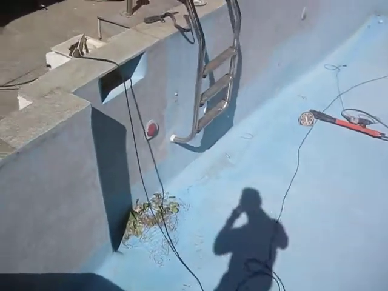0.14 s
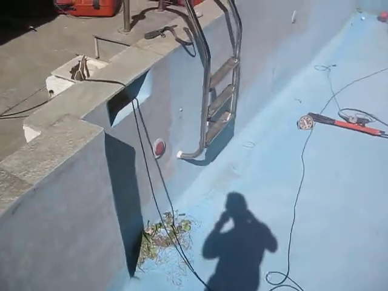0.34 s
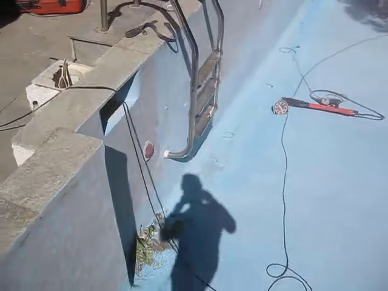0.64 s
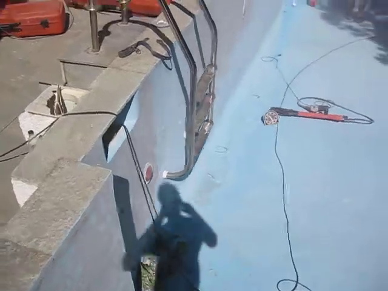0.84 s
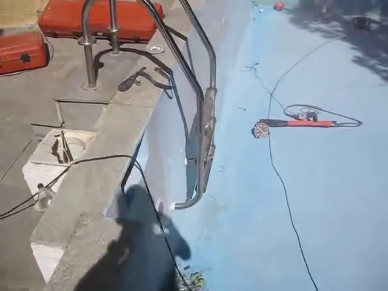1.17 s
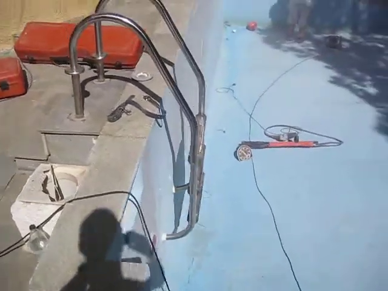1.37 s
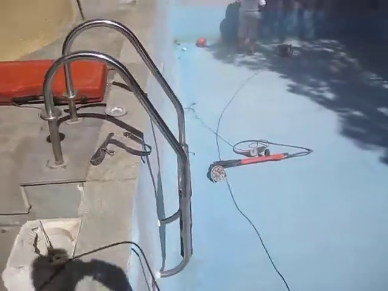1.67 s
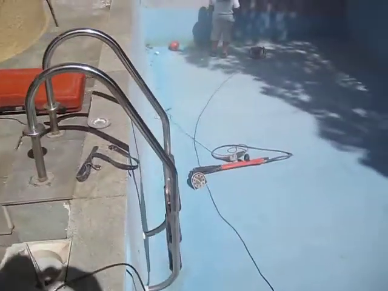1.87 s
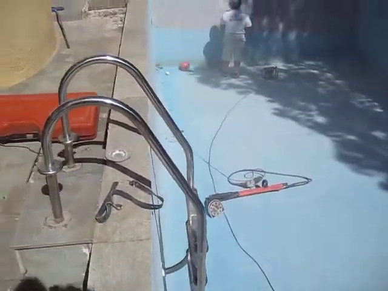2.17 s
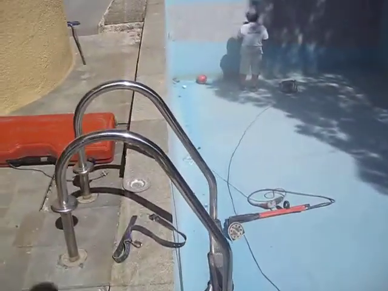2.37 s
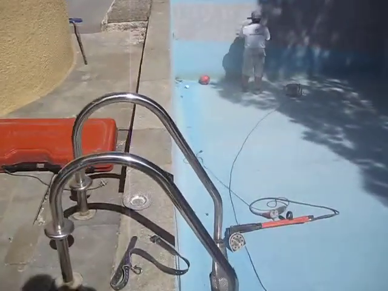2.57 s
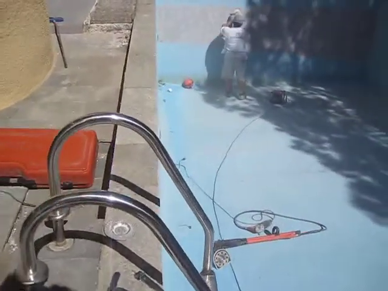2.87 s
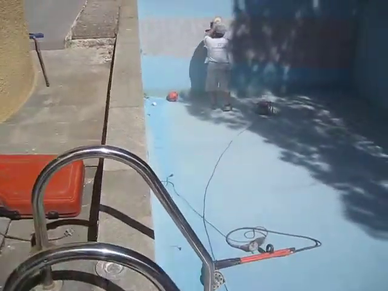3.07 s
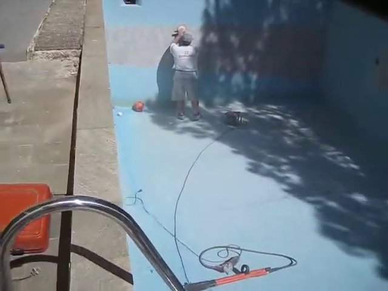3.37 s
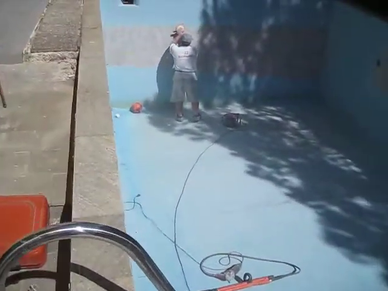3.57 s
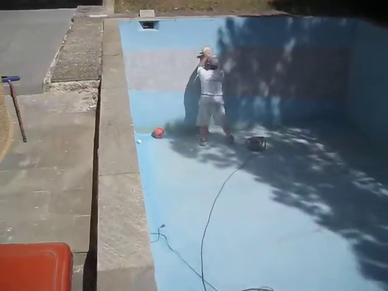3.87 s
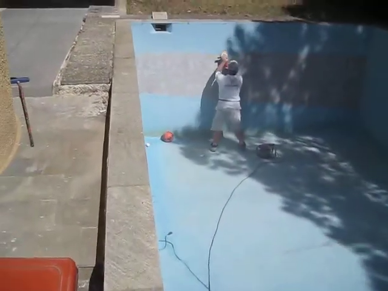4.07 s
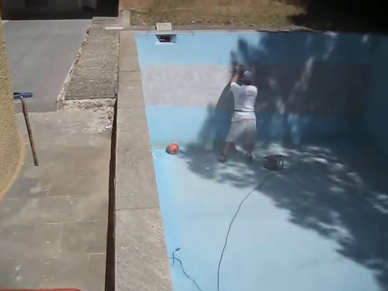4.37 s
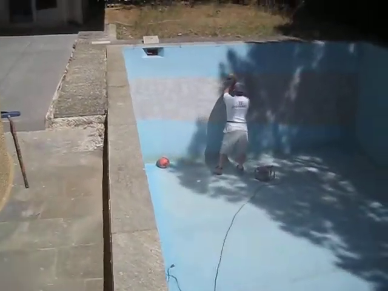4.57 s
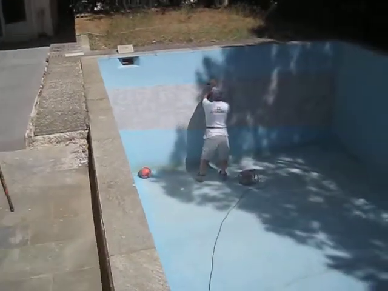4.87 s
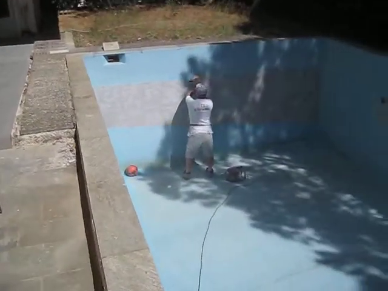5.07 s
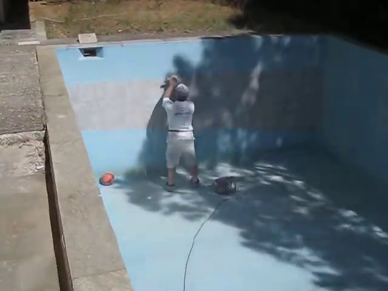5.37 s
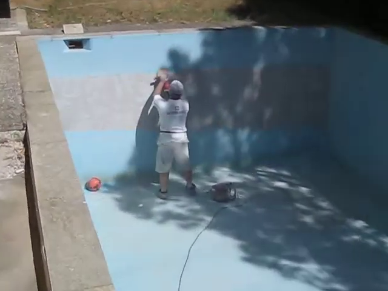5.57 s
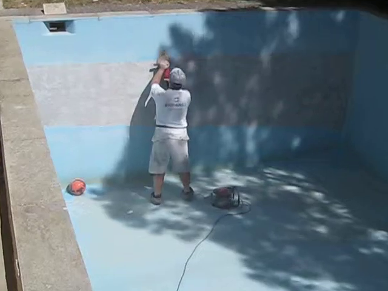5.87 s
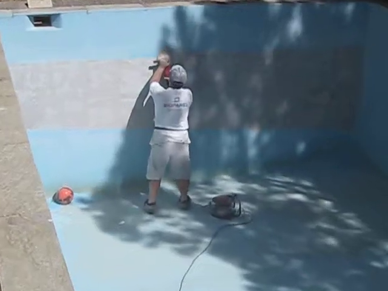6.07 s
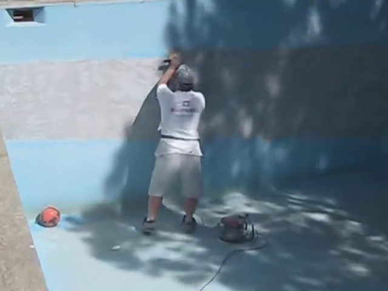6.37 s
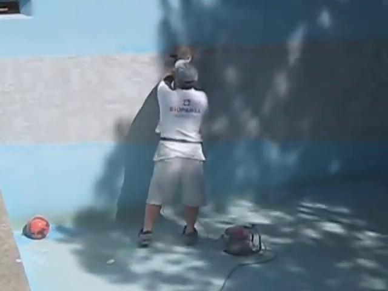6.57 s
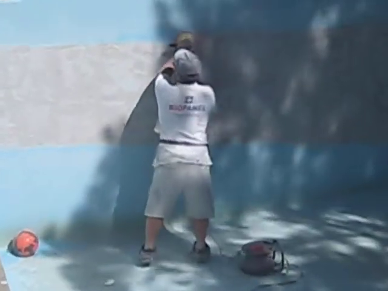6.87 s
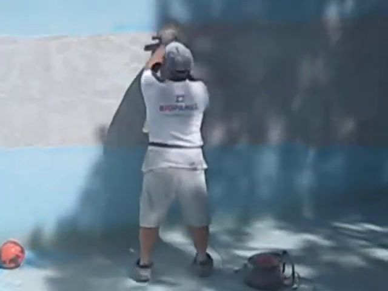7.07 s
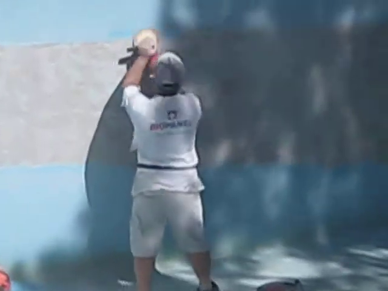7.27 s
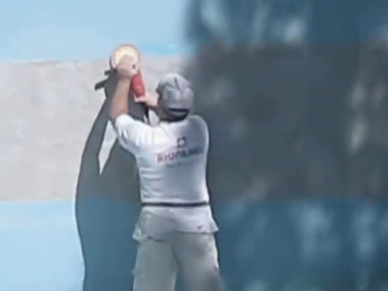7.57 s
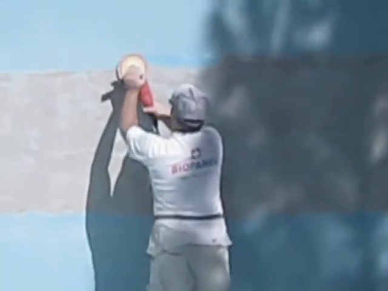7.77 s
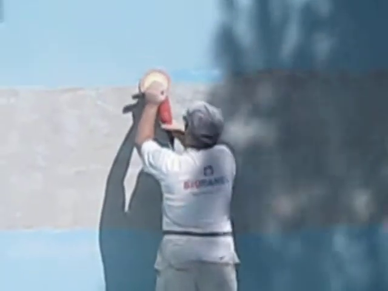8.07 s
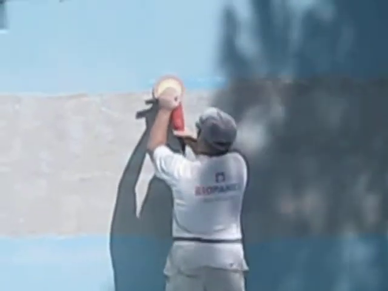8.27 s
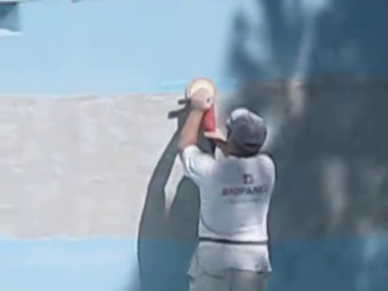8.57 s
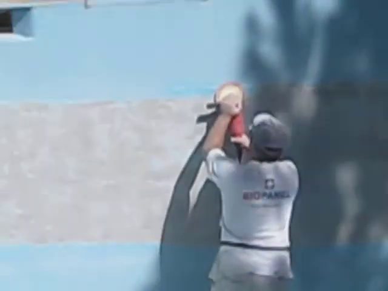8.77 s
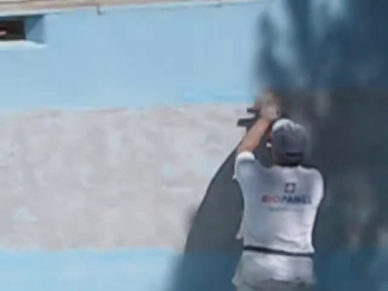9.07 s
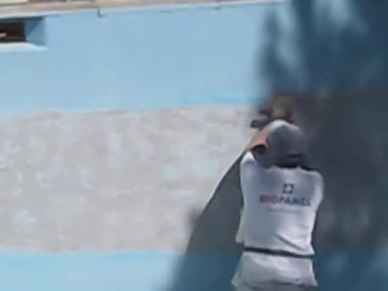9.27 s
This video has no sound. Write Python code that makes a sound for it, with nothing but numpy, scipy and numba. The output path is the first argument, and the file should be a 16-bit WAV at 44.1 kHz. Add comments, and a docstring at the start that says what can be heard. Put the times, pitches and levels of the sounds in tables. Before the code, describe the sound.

An angle grinder works on the wall of an empty concrete pool, heard from the rim with short, hard echoes. For the first three seconds it coasts unpowered: the disc rubs and bounces on the wall in quick runs of slaps, with light metallic pings, while its whine sinks and fades. At about 3.3 seconds the motor cuts in with a sharp clank and whines up to speed within a second. From then on the disc strips paint with a bright, fluttering rasp, a fine hiss and a rough growl, ringing out in brief swells. The whine sags under pressure around 6.3 seconds, recovers, sags again from 8 to 9 seconds and rises as the grinding continues to the end, near 9.5 seconds. Gusts of wind rumble and pop on the microphone, strongest around 3 seconds and easing after 7.

```python
"""An angle grinder strips paint from the wall of an empty concrete pool, heard from the rim.
At first the disc coasts down, bouncing on the wall in short runs under a sinking whine.
At 3.3 s the motor cuts in with a jolt and whines up to speed; later it sags under load.
The grit rasps once per turn, growls on the wall and sets the disc ringing.
All the while the pool returns short echoes and gusts pop on the microphone."""
import sys
import numpy as np
from scipy import signal
from scipy.fft import rfft, irfft, next_fast_len
from scipy.io import wavfile
from scipy.ndimage import uniform_filter1d, map_coordinates
from numba import njit

SR = 44100
rng = np.random.default_rng(int(sys.argv[2]) if len(sys.argv) > 2 else 0)


def to_wav(sig):
    """Store sig (one row per channel, or 1-D mono) as 16-bit WAV at the path in sys.argv[1].

    Samples outside -1..1 are clipped; the rate is SR.
    """
    pcm = np.clip(np.atleast_2d(sig), -1, 1) * 32767
    pcm = np.round(pcm).astype(np.int16)
    wavfile.write(sys.argv[1], SR, pcm.T)  # frames by channels


N = 415422
TIME = np.arange(N) / SR
SWITCH_ON_S = 3.293
WHINE_ORDER = 37.66   # motor whine cycles per turn of the disc


def from_db(db):
    return 10 ** (np.asarray(db) / 20)


def rms_one(x):
    return x / np.sqrt(np.mean(x ** 2) + 1e-20)


def noise():
    return rng.standard_normal(N)


def curve(rows):
    """An automation line through (seconds, value) points."""
    return np.interp(TIME, *np.transpose(rows))


def swells(rows, rest_db):
    """Level in dB of rounded swells over a resting level."""
    power = sum(from_db(db) ** 2 / (1 + (2 * (TIME - s) / length) ** 6) for s, length, db in rows)
    return 10 * np.log10(from_db(rest_db) ** 2 + power)


def coloured(x, spectrum):
    """Equalises a sound through (Hz, dB) points; rms 1."""
    hz, db = np.transpose(spectrum)
    size = next_fast_len(N)
    bins = np.maximum(np.arange(size // 2 + 1) * SR / size, 1)
    gain = from_db(np.interp(np.log(bins), np.log(hz), db))
    return rms_one(irfft(rfft(x, size) * gain, size)[:N])


def drift(rate):
    """A random wander through `rate` points a second; rms 1."""
    knots = rng.standard_normal(4000)
    return rms_one(map_coordinates(knots, [TIME * rate], order=1, mode="wrap"))


@njit
def sweep(x, centre, width):
    """A resonance whose centre moves; frequencies in cycles per sample."""
    out, state, decay = np.zeros(len(x)), 0j, np.exp(-np.pi * width)
    for i in range(len(x)):
        state = state * decay * np.exp(2j * np.pi * centre[i]) + x[i]
        out[i] = state.real
    return out


def resonance(x, hz, width_hz):
    """Two moving resonances in a row, for steep flanks; rms 1."""
    centre, width = hz / SR, width_hz / SR
    return rms_one(sweep(sweep(x, centre, width), centre, width))


def grit(spread_db):
    """Dense fractures of unequal size."""
    return rms_one(noise() * from_db(spread_db * drift(1500)))


def each_turn(turns, share):
    """The same bumps come round on every turn; the lower the share, the more fresh noise joins them."""
    count, size = 64, 1024
    bumps = rms_one(irfft(np.r_[0, np.exp(2j * np.pi * rng.random(count))], size))
    repeated = np.interp(turns % 1, np.arange(size) / size, bumps, period=1)
    return np.sqrt(share) * repeated + 2 * np.sqrt(1 - share) * noise()


def bite(turns, depth_db, sharpness):
    """The high spot of the disc digs in once per turn; rms 1."""
    return rms_one(from_db(depth_db * np.abs(np.cos(np.pi * turns)) ** (2 * sharpness)))


def eddies(wind_db, count=400):
    """Times and levels of small random pops, more frequent and harder in a gust."""
    most_per_s, full_gust_db = 7, -37.5
    when, luck, size = rng.random((count, 3)).T
    gust_db = np.minimum(wind_db[(when * N).astype(int)], full_gust_db)
    breaks = luck < most_per_s * N / SR / count * from_db(gust_db - full_gust_db)
    pop_db = gust_db + 17.5 + 2.5 * (2 * size - 1)
    return list(zip(when[breaks] * N / SR, pop_db[breaks]))


# The hardest wind pops. Each row: time in seconds, relative level in dB.
HARD_POPS = [(0.519, -17), (0.699, -17), (1.03, -15), (1.056, -17.5), (1.906, -14), (2.101, -14),
             (2.417, -10.5), (2.836, -14.5), (2.9, -11), (2.959, -14), (3.059, -10.5), (3.125, -12),
             (3.355, -9.5), (3.74, -14), (3.757, -8.5), (3.826, -11), (4.01, -18), (4.466, -15),
             (4.662, -12.5), (4.938, -16.5), (5.097, -18), (5.346, -8), (5.556, -10.5), (5.605, -13),
             (6.246, -13.5), (6.7, -10.5), (6.81, -12), (6.95, -8), (6.984, -11.5), (7.034, -12.5),
             (7.114, -8.5), (7.257, -15)]

def pops(wind_db, wake):
    """Sharp pressure spikes where an eddy breaks on the microphone's port."""
    tearing = coloured(noise(), [(150, -15), (600, 10), (950, -3), (2500, -45)])
    out = np.zeros(N)
    for s, db in list(HARD_POPS) + eddies(wind_db):
        near = np.flatnonzero(np.abs(TIME - s) < .06)
        age = TIME[near] - s
        hz = np.interp(db, [-20, -9], [220, 350])   # stronger eddies break faster
        swing = np.pi * hz * age
        spike = (1 - 2 * swing ** 2) * np.exp(-swing ** 2)
        flutter = 0.22 * wake[near] * np.exp(-np.abs(age) / 0.0078)
        crackle = 0.64 * from_db(db) * tearing[near] * np.exp(-np.abs(age) / 0.0043)
        out[near] += from_db(db - 1.14) * (spike + flutter + crackle)
    return out


# Gusts. Each row: middle in seconds, length in seconds, relative level in dB.
GUST_SWELLS = [(.4, 1, -41.5), (1.06, 0.11, -37.5), (1.33, 0.13, -41), (2.3, 0.83, -38.5),
               (3.0, 0.26, -30.5), (3.39, 0.21, -37), (3.85, 0.29, -37.5), (4.45, 0.1, -36),
               (4.92, 0.57, -39), (5.54, 0.22, -34.5), (6.26, 0.083, -38.5), (6.98, 0.66, -37),
               (8.05, 0.1, -42.5), (8.7, 0.11, -44.5)]
# The wind's rumble. Each row: frequency in Hz, gain in dB.
BUFFET_EQ = [(12, -42), (20, 1), (70, 5), (247, -4), (300, -7.5), (380, -7.5), (700, -15.5), (910, -48),
             (1540, -120)]

def wind():
    """Gusts over a faint breeze hit the microphone: lumpy buffeting, small eddies and pops."""
    wind_db = swells(GUST_SWELLS, rest_db=-52)
    lumps = from_db(6 * np.minimum(drift(65), 1.4))
    rumble = coloured(noise(), BUFFET_EQ + [(1200, -34), (3000, -70)])
    buffet = from_db(wind_db + 2) * rms_one(rumble * lumps)
    wake = coloured(noise(), [(40, -21), (150, 5.5), (400, -2), (800, -8.5), (1500, -13), (3000, -70)])
    bursts = from_db(23 * np.minimum(drift(130), 2))
    small_eddies = from_db(wind_db - 4.5) * rms_one(wake * bursts)
    return buffet + small_eddies + pops(wind_db, wake)


# Early reflections. Each row: delay in seconds, level in dB.
POOL_ECHOES = [(.0043, -25), (0.019, -15), (0.029, -21)]

def pool(x):
    """Hard floor and walls return a few plain echoes."""
    return x + sum(from_db(db) * np.interp(TIME - s, TIME, x, left=0) for s, db in POOL_ECHOES)


# Runs of bounces. Each row: start in seconds, number of bounces, gap in seconds, relative level in dB.
BOUNCES = [(.041, 2, 0.058, -19), (.191, 8, 0.06, -19.5), (.678, 4, 0.046, -22), (.87, 2, 0.047, -25),
           (.969, 2, 0.04, -21.5), (1.08, 2, 0.078, -22), (1.225, 2, .084, -23.5), (1.39, 4, 0.056, -21),
           (1.637, 4, 0.092, -21.6), (1.783, 3, .091, -27), (2.088, 2, 0.049, -23.5),
           (2.234, 3, 0.046, -22.5), (2.442, 2, .035, -20), (2.54, 3, 0.061, -21.5), (2.694, 4, .0615, -18),
           (2.931, 2, 0.079, -21), (3.064, 2, 0.064, -19.5), (3.191, 3, 0.039, -19)]

def bouncing():
    """Contact envelope of the coasting disc on the wall, each bounce a little uneven."""
    hits = [(s + k * gap + 0.0009 * rng.normal(), db + rng.normal())
            for s, count, gap, db in BOUNCES for k in range(round(count))]
    contact = np.zeros(N)
    for s, db in hits:
        length = np.interp(s, [0, 1.7, 3.3], [.011, .009, .004])   # snappier as the disc slows
        start = max(int((s - 0.51 * length) * SR), 0)
        age = TIME[:SR // 8] / length
        contact[start:start + len(age)] += from_db(db) * age * np.exp(1 - age)
    return contact


# The steel guard's notes. Each row: frequency in Hz, width in Hz, relative level in dB.
GUARD_MODES = [(4020, 260, -48), (6990, 360, -48.5), (8350, 340, -42.5)]

def guard_pings(contact, third_hz, fade_db):
    """Each slap brings out the whine's third harmonic and rings the guard, in a new mix every time."""
    flare_db = 16 / (1 + ((third_hz - 3994) / 190) ** 2)   # as it sinks through the guard's note
    third = resonance(noise(), third_hz * (1 + 0.0066 * drift(18)), width_hz=200)
    pings = from_db(-40 - 1.8 * fade_db + flare_db) * third
    for hz, width_hz, db in GUARD_MODES:
        pings += from_db(db + 3 * drift(18)) * resonance(noise(), hz * (1 + .02 * drift(16)), width_hz)
    return pings * (0.42 + 1.72 * np.tanh(contact / from_db(-20)))   # some ring stays between bounces


# The tones of a light rub and a hard slap. Each row: frequency in Hz, gain in dB.
RUB_EQ = [(200, -18), (600, -1), (1200, -1), (2200, 3), (3200, -1.5), (4000, 2), (5100, 0.5), (6100, -8),
          (7300, -8), (10500, -3.5), (11300, -4), (11900, 0), (13400, -14.5), (16000, -18)]
SLAP_EQ = [(300, -36), (800, -15), (1500, 5), (2300, 6.5), (3100, 1), (4000, 7.5), (5200, 7.5), (6100, -2),
           (7100, -3), (8800, 4.5), (10000, -2.5), (14000, -16)]

def coasting():
    """Unpowered, the disc rubs and slaps on the wall while the whine sinks and fades."""
    speed = 48.6 * np.exp(-TIME / 6)   # turns per second
    contact = bouncing()
    rub = from_db(-32 + .6 * drift(25)) * coloured(grit(spread_db=1.35), RUB_EQ)
    slaps = from_db(-6.5) * contact * coloured(grit(spread_db=2), SLAP_EQ)
    whine_hz = WHINE_ORDER * speed
    fade_db = 1.07 * np.maximum(38.1 - speed, 0)
    whine = from_db(-36.5 - fade_db) * resonance(noise(), whine_hz, width_hz=330)
    whine *= 0.6 + contact / from_db(-17.5)
    pings = guard_pings(contact, 3 * whine_hz, fade_db)
    return (TIME < SWITCH_ON_S) * (rub + slaps + whine + pings)


# The gear housing's clank. Each row: frequency in Hz, level in dB, seconds to fall by 60 dB.
HOUSING_MODES = [(955, -20, 0.1), (1270, -20, .13), (1530, -22, 0.13), (2150, -26, 0.22)]

def jolt():
    """The gears take up their slack as the motor cuts in."""
    age = np.maximum(TIME - SWITCH_ON_S, 0)
    clank = sum(from_db(db - 60 * np.minimum(age / t60, 5)) * np.sin(2 * np.pi * (hz * age + rng.random()))
                for hz, db, t60 in HOUSING_MODES)
    crack = from_db(-19) * coloured(noise(), SLAP_EQ) * np.exp(-np.minimum(age / 0.039, 50))
    return (clank + crack) * np.minimum(age / 0.0011, 1)


# How hard the disc is pressed. Each row: time in seconds, relative growl level in dB.
GROWL_LEVELS = [(3.3, -39.5), (3.65, -37.5), (4.15, -42.5), (4.58, -44), (4.7, -38), (6.1, -38),
                (6.65, -34), (7.35, -39), (8.3, -40), (9.42, -35)]
# The growl's tone. Each row: frequency in Hz, gain in dB.
GROWL_EQ = [(200, -22), (420, -23), (520, -1.5), (900, -5), (1200, 0.5), (1600, -2), (2000, 4.5),
            (2400, 7.5), (2900, -1.5), (4000, -10)]

def wall_growl(turns, hand):
    """The disc growls on the wall, louder as it is pressed."""
    level = from_db(curve(GROWL_LEVELS) + 7.5 + hand)
    return level * coloured(each_turn(turns, share=0.29), GROWL_EQ)


# Swells of ringing. Each row: middle in seconds, length in seconds, pitch in Hz, relative level in dB.
DISC_RINGS = [(3.5, 0.39, 1075, -35), (4.295, 0.31, 1000, -35), (4.67, .2, 1056, -30.5),
              (4.894, 0.2, 1060, -31.5), (6.15, 0.61, 1160, -37), (6.84, 0.42, 1120, -33),
              (8.42, 0.29, 1143, -35), (8.8, .3, 1190, -37.5), (9.27, 0.45, 1140, -36)]

def disc_ring(turns):
    """The disc rings out when it meets the wall at the right angle."""
    ring_hz = curve([(s, hz) for s, length, hz, db in DISC_RINGS])
    ring_db = swells([(s, length, db) for s, length, hz, db in DISC_RINGS], rest_db=-44)
    steady = curve([(4.3, .12), (4.9, .82)])   # steady running brings clear multiples of its speed
    ring = resonance(each_turn(turns, share=steady), ring_hz, width_hz=145)
    skimming = curve([(4.5, 1), (4.7, .1)])   # skimming the wall spreads the ring into a rough drone
    drone = resonance(noise(), 0.96 * ring_hz, width_hz=490)
    blend = np.sqrt(1 - skimming) * ring + np.sqrt(skimming) * drone
    return from_db(ring_db - 1.4 + 2 * drift(14)) * blend


def motor_whine(speed, turns, skip):
    """The motor's whine climbs and grows with speed, a broad shoulder of rushing air just under it."""
    free_speed, full_level_speed = 97, 82   # turns per second
    surge = curve([(3.8, 1), (4.03, 1.07), (4.3, 1)])   # flares sharp at the end of the run-up
    whine_hz = WHINE_ORDER * speed * surge * (1 + 0.014 * drift(70))
    whine = resonance(each_turn(turns, share=0.42), whine_hz, width_hz=570)
    air = resonance(each_turn(turns, share=0.46), 0.906 * whine_hz, width_hz=800)
    load = np.clip(1 - speed / free_speed, 0, .2)
    whine += from_db(-11 + 41 * load) * air
    run_up = np.clip(speed / full_level_speed, 0, 1)
    acceleration = uniform_filter1d(np.gradient(speed) * SR, size=SR // 5)
    pull_db = 0.5 * np.tanh(acceleration / 21) * run_up   # louder gathering speed, softer sagging
    whine *= from_db(-26 + 1.56 * drift(35) + pull_db) * run_up ** 3.5
    return whine * bite(turns, depth_db=4.1 * skip, sharpness=2.3)


# Work on the wall. Each row: time in seconds, relative levels of rasp and of hiss in dB.
SCRAPE_LEVELS = [(3.3, -25.5, -36), (3.42, -25.5, -31), (4.55, -27.5, -31), (4.74, -31, -30),
                 (5.2, -25.5, -28.5), (6.6, -27, -30), (7.9, -26, -27), (9.05, -27, -29),
                 (9.42, -27, -34.5)]
# The tones of the bright rasp and the fine hiss. Each row: frequency in Hz, gain in dB.
RASP_EQ = [(300, -36), (600, -36), (1600, -20), (2100, -23), (2500, -2), (3000, -1), (4300, 3.5),
           (5500, 3.5), (7000, -2), (9000, -14.5), (12000, -35)]
HISS_EQ = [(4000, -36), (7000, -8.5), (9000, 1), (10300, 2), (12000, -3), (13600, -10.5), (16000, -14)]

def grit_scrape(turns, hand, skip):
    """The grit cuts the paint with a rasp and a hiss, both pulsing once per turn."""
    rasp_db = curve([(s, db) for s, db, _ in SCRAPE_LEVELS])
    hiss_db = curve([(s, db) for s, _, db in SCRAPE_LEVELS])
    rasp = coloured(each_turn(turns, share=0.07) * from_db(drift(1500)), RASP_EQ)
    rasp *= from_db(rasp_db + 2.5 + 0.76 * hand)
    rasp *= bite(turns, depth_db=3.1 * skip, sharpness=5.1)
    hiss = coloured(grit(spread_db=1.5), HISS_EQ)
    hiss *= from_db(hiss_db - 0.15 + 0.23 * hand + drift(30))
    hiss *= bite(turns, depth_db=6.6 * skip, sharpness=5.1)
    return rasp + hiss


# The disc runs up, then sags whenever it is leant on. Each row: time in seconds, turns per second.
DISC_SPEED = [(3.3, 30), (3.78, 74), (4.0, 86.5), (4.3, 96.3), (4.96, 96.6), (5.3, 92.8), (5.58, 96.8),
              (5.74, 97.2), (6.2, 85.3), (6.44, 81.8), (6.84, 93.8), (7.3, 92.2), (7.74, 96.8),
              (7.92, 84.5), (8.2, 77.9), (8.74, 77.5), (9.08, 79.6), (9.42, 91.5)]

def grinding():
    """Under power, the turning disc drives the scrape, growl, ring and whine together."""
    speed = curve(DISC_SPEED)
    turns = np.cumsum(speed) / SR
    hand = drift(30)   # unsteady pressure
    # a lightly held disc touches only with its high spot; pressed home it cuts all the way round
    skip = curve([(3.3, 1.05), (4.0, 1.24), (4.8, 1.24), (5.3, 0.39), (7.1, 0.47), (9.4, 0.69)])
    skip *= 1 + 0.31 * drift(90)   # no two bites are alike
    disc = grit_scrape(turns, hand, skip) + wall_growl(turns, hand) + disc_ring(turns)
    powered = np.clip((TIME - SWITCH_ON_S) / 0.0018, 0, 1)
    return powered * (disc + motor_whine(speed, turns, skip))


def scene():
    """The grinder in the pool and the wind at the rim, in mono."""
    grinder = grinding() + coasting() + jolt()
    return (from_db(-0.4) * pool(grinder) + wind())[None]


def record(dry):
    """The small camera's microphone has a deep notch in the treble and a steep top end."""
    notch_hz, cutoff_hz = 7915, 15800
    notched = signal.lfilter(*signal.iirnotch(notch_hz, Q=5.5, fs=SR), dry)
    return signal.sosfilt(signal.ellip(12, .1, 80, cutoff_hz, fs=SR, output="sos"), notched)


dry = scene()
out = record(dry)
to_wav(out)
```